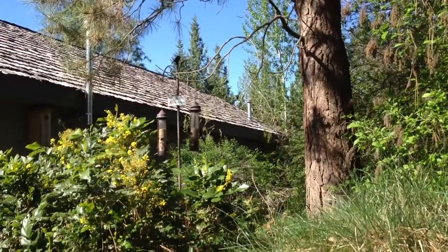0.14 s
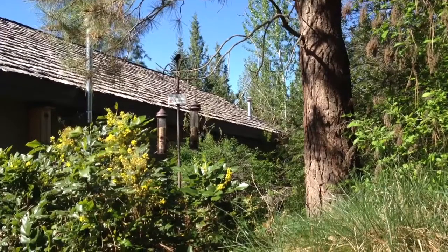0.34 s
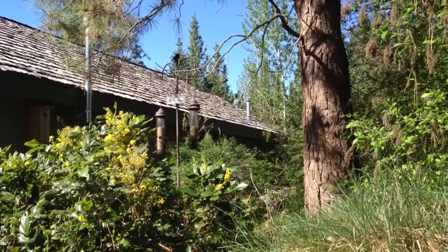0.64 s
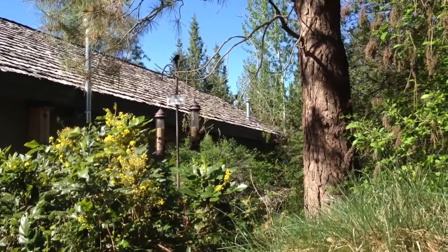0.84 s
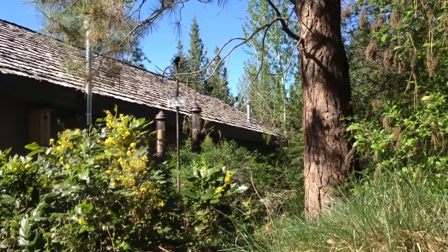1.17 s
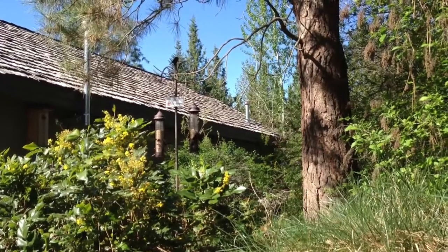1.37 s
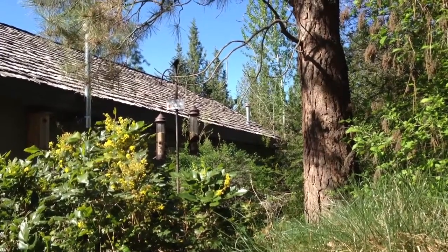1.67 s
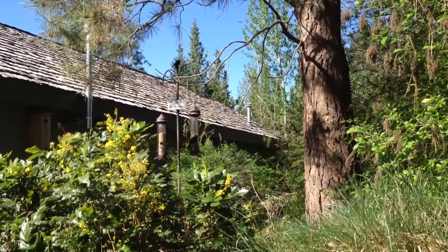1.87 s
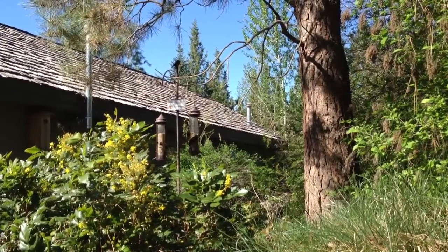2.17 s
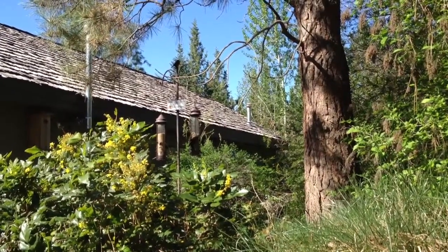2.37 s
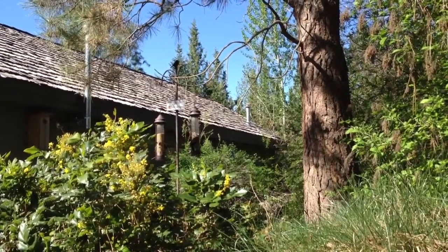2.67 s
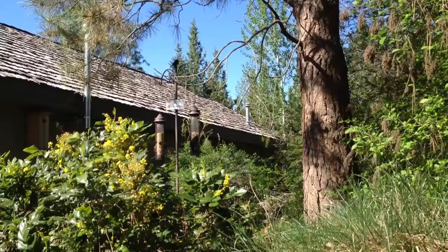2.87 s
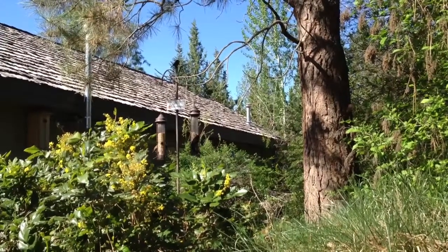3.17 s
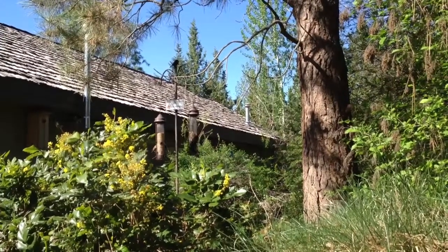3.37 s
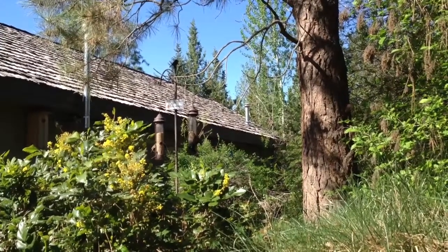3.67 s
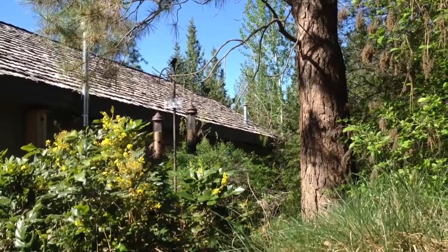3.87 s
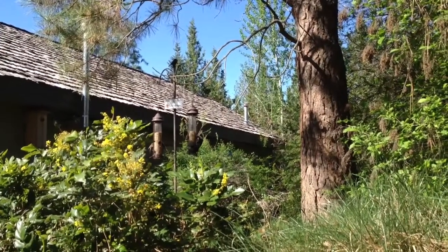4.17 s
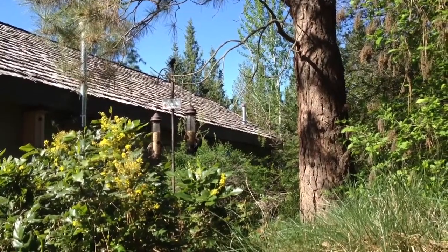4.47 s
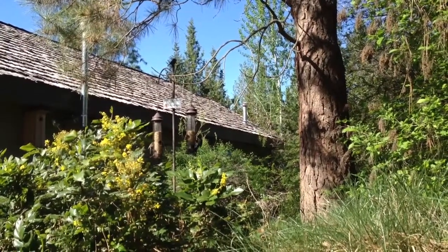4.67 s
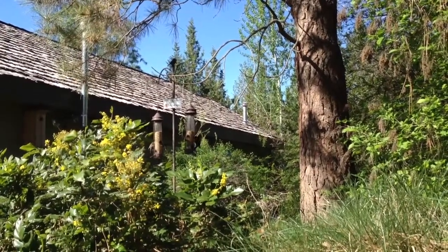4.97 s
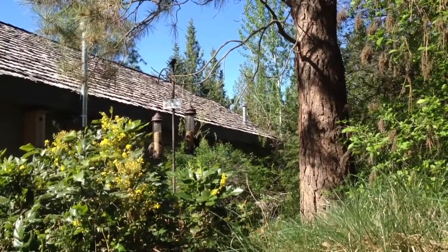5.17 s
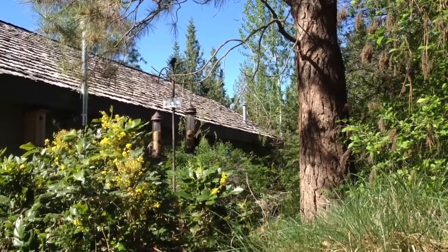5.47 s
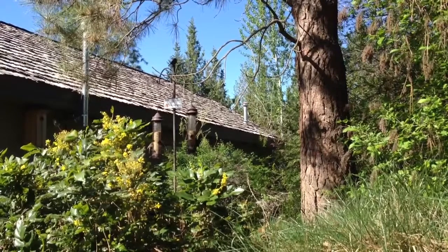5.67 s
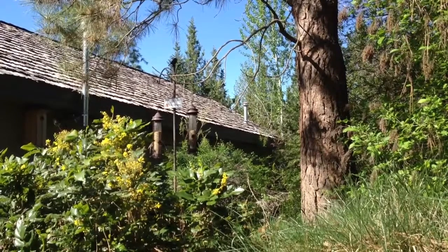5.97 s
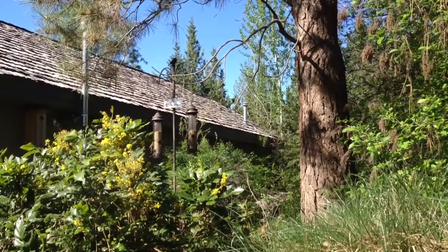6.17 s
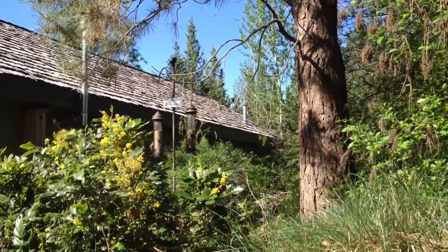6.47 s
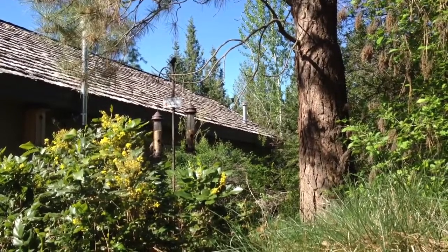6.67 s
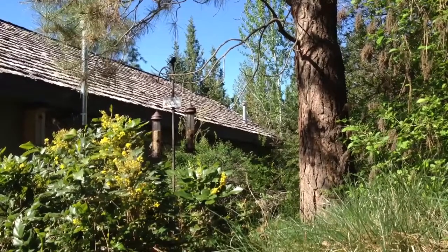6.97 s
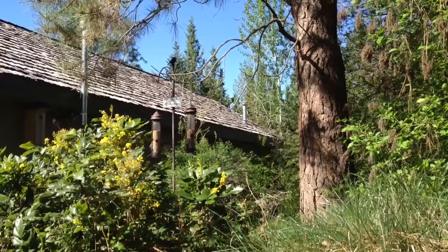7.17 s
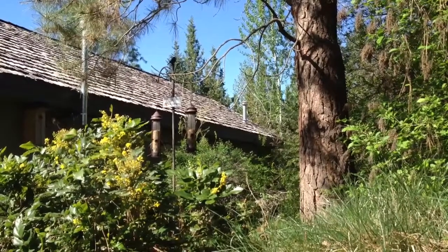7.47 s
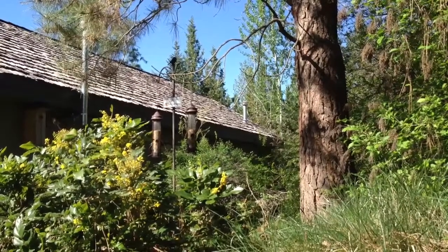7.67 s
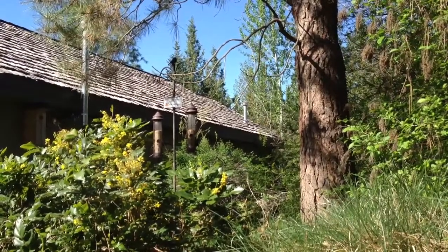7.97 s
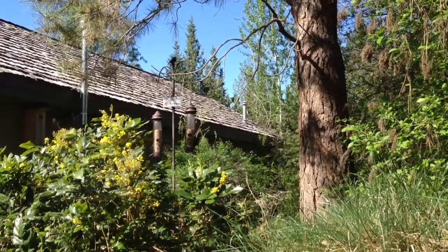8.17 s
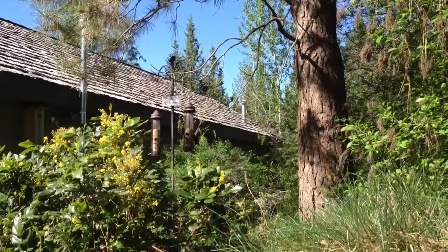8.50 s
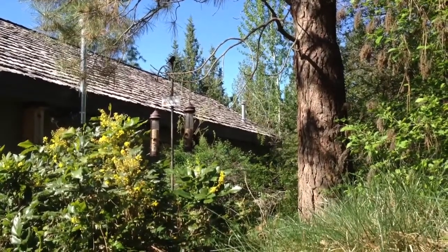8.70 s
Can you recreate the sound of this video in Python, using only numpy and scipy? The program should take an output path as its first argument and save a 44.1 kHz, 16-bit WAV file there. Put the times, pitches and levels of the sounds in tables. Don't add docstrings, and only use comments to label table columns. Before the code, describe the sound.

Outdoor birdsong, close and distant, over very quiet traffic rumble and hiss. Isolated chucks and chirps lead to a clear, broken whistle just after one second. From about two and a half seconds the chorus thickens with thin whistles, buzzes, low fluty notes, quick zips and a rasping trill. It thins near six seconds, then a loud sliding whistle, hooked chirps and strong chucks arrive. Short garden reflections surround a stationary microphone.

```python
import sys
import numpy as np
from scipy import signal
from scipy.fft import rfft, irfft, next_fast_len
from scipy.io import wavfile
from scipy.ndimage import uniform_filter1d

SR = 44100
rng = np.random.default_rng(int(sys.argv[2]) if len(sys.argv) > 2 else 0)


def persist_wave(psi):
    counts = np.round(np.clip(psi, -1, 1) * 32767).astype(np.int16)
    wavfile.write(sys.argv[1], SR, np.atleast_2d(counts).T)


def elevation(decibels):
    levels = np.asarray(decibels, float)
    return 10 ** (levels / 20)


N = 389844

# (multiple of the pitch [1], level [dB])
WHISTLE_OVERTONES = [(1, -0.5), (2, -34), (3, -36)]
# (multiple of the pitch [1], level [dB])
CHIRP_OVERTONES = [(1, 5.5), (2, -39), (3, -27)]
# (multiple of the pitch [1], level [dB])
HARSH_PARTIALS = [(1, 4.5), (1.751, -24.5), (2.7, -23), (3.3, -32)]


def rms_one(x):
    return x / np.sqrt(np.mean(x ** 2) + 1e-20)


def slow_chance(count, rate_hz):
    pole = np.exp(-2 * np.pi * rate_hz / SR)
    settling = 4000
    white = rng.standard_normal(count + settling)
    return rms_one(signal.lfilter([1], [1, -2 * pole, pole * pole], white)[settling:])


def coloured_noise(spectrum):
    size = next_fast_len(N)
    hz = np.maximum(np.arange(size // 2 + 1) * SR / size, 1)
    point_hz, point_db = np.array(spectrum).T
    level_db = np.interp(np.log(hz), np.log(point_hz), point_db, left=-90, right=-90)
    return rms_one(irfft(rfft(rng.standard_normal(size)) * elevation(level_db), size)[:N])


def sing(note, tones, jitter, jitter_hz, rasp_db=-90, rasp_low_hz=2400, slide_rough=1.1, flicker_db=3.0):
    s, pitch_hz, level_db = np.transpose(note)
    t = np.arange(s[0], s[-1], 1 / SR)
    pitch_hz = np.interp(t, s, pitch_hz)
    level_db = np.interp(t, s, level_db)

    sliding = uniform_filter1d(np.abs(np.gradient(np.log(pitch_hz))) * SR, size=600)
    unsteady = jitter * (1 + slide_rough * np.minimum(sliding, 3.0))
    sung_hz = pitch_hz * (1 + unsteady * slow_chance(len(t), jitter_hz))
    phase = 2 * np.pi * np.cumsum(sung_hz) / SR
    voice = sum(elevation(db) * np.sqrt(2) * np.sin(k * phase + k * k) for k, db in tones)

    rasp_band = signal.butter(1, [rasp_low_hz, 4800], "band", fs=SR)
    rasp = signal.lfilter(*rasp_band, rng.standard_normal(len(t)))
    effort_db = .45 * (level_db + 40)
    voice = voice + elevation(rasp_db + effort_db) * rasp

    flutter_db = flicker_db * slow_chance(len(t), 77)
    flutter_db = flutter_db - flutter_db.mean()
    fade_s = np.clip(.04 * (s[-1] - s[0]), .0006, .006)
    fade = np.clip(np.minimum(t - s[0], s[-1] - t) / fade_s, 0, 1)
    return voice * elevation(level_db + flutter_db) * fade


def garden(early_db, tail_db, t60):
    t = np.arange(int(.9 * SR)) / SR
    sparse = rng.standard_normal(len(t)) * (rng.random(len(t)) < 800 / SR)
    wall_s, wall_spread_s = .036, .002
    wall = 1 + 2.2 * np.exp(-.5 * ((t - wall_s) / wall_spread_s) ** 2)
    early = sparse * wall * (t > .004) * elevation(-60 * np.maximum(t - .04, 0) / 0.13)
    tail = rng.standard_normal(len(t)) * np.minimum(t / 0.0039, 1) * elevation(-60 * t / t60)
    echoes = elevation(early_db) * early / np.linalg.norm(early)
    echoes = echoes + elevation(tail_db) * tail / np.linalg.norm(tail)
    echoes = signal.lfilter([.85], [1, -.15], echoes)
    echoes[0] = 1
    return echoes / np.linalg.norm(echoes)


def add(out, s, sound, echoes):
    start = int(s * SR)
    heard = signal.fftconvolve(sound, echoes)
    heard = heard * np.linalg.norm(sound) / np.linalg.norm(heard)
    heard = heard[:N - start]
    out[start:start + len(heard)] += heard


def chorus(notes, tones, jitter, jitter_hz, early_db, tail_db, t60, rasp_db=-90, slide_rough=1.27, flicker_db=3.5):
    out = np.zeros(N)
    for note in notes:
        voice = sing(note, tones, jitter, jitter_hz, rasp_db, slide_rough=slide_rough, flicker_db=flicker_db)
        add(out, note[0][0], voice, garden(early_db, tail_db, t60))
    return out


def arch(share, peak_share, rise_db, fall_db):
    peak = np.clip(peak_share, .05, .95)
    before = np.maximum(1 - share / peak, 0)
    after = np.maximum((share - peak) / (1 - peak), 0)
    return rise_db * before ** 2 + fall_db * after ** 2


def glides(rows, bend, peak_share, rise_db, fall_db):
    share = np.linspace(0, 1, 24)
    left = (np.exp(-bend * share) - np.exp(-bend)) / (1 - np.exp(-bend))
    loss_db = arch(share, peak_share, rise_db, fall_db)
    notes = []
    for s, length, first_hz, last_hz, db in rows:
        pitch_hz = last_hz + (first_hz - last_hz) * left
        notes.append(np.c_[s + length * share, pitch_hz, db - loss_db])
    return notes


def air():
    # (frequency [Hz], density [dB per Hz])
    air_colour = [(25, -32), (42, -20), (60, -15), (150, 0.5), (230, 0), (480, -6), (1300, -5), (2000, -8),
                  (3200, -18), (4900, -20.5), (5700, -19.5), (8500, -19.5), (12000, -22), (15300, -23)]
    return elevation(-60.5) * coloured_noise(air_colour)


def flock():
    # (time [s], level [dB])
    flock_loudness = [
        (0.0, -79.5),
        (2.56, -78),
        (2.6, -61),
        (3.1, -65),
        (3.599, -69),
        (4.36, -60.5),
        (6.202, -81.5),
        (6.872, -82),
        (8.84, -65),
    ]
    # (frequency [Hz], density [dB per Hz])
    flock_colour = [(2400, -2.5), (3300, -4), (4300, -2.5), (5000, -3), (5700, -13.5), (8500, -26)]
    s, loud_db = np.transpose(flock_loudness)
    band = coloured_noise(flock_colour)
    drift_db = 1.3 * slow_chance(N, 14.0)
    return band * elevation(np.interp(np.arange(N) / SR, s, loud_db) + 4.5 + drift_db)


def strands():
    # (time [s], length [s], first pitch [Hz], last pitch [Hz], level [dB])
    held_rows = [(2.046, .065, 4250, 4380, -62), (2.041, .07, 3550, 3750, -64),
                 (2.546, .06, 4850, 4800, -57), (3.201, .18, 5020, 4970, -65),
                 (1.371, .06, 5600, 5560, -63), (1.281, .04, 5950, 6000, -68),
                 (1.266, .03, 4950, 4900, -55), (4.231, .06, 3820, 3780, -55),
                 (4.031, .12, 5500, 5600, -66), (4.331, .15, 2800, 2760, -55),
                 (7.821, .07, 4150, 4500, -60), (8.171, .06, 4950, 4950, -57),
                 (8.576, .035, 3480, 3400, -54), (6.42, .04, 3000, 2970, -62)]
    notes = glides(held_rows, bend=1.5, peak_share=.45, rise_db=4, fall_db=4)
    return chorus(notes, WHISTLE_OVERTONES, .006, 140, early_db=-3, tail_db=-6, t60=.25)


def far_slurs():
    # (time [s], length [s], settled pitch [Hz], level [dB], loudest moment [0-1])
    slur_rows = [
        (.47, 0.35, 4150, -50.5, 0.62),
        (5.34, 0.41, 4270, -50, 0.07),
        (7.52, 0.15, 4170, -49, 0.46),
    ]
    # (multiple of the pitch [1], level [dB])
    far_overtones = [(1, -1.5), (2, -26.5), (3, -26.5)]
    first_hz, settle_s = 5500, 0.045
    ramp_s, ramp_db = 0.011, 3
    share = np.linspace(0, 1, 60)
    notes = []
    for s, length, held_hz, db, peak_share in slur_rows:
        t = length * share
        pitch_hz = held_hz + (first_hz - held_hz) * np.exp(-t / settle_s)
        attack_loss_db = ramp_db * np.maximum(1 - t / ramp_s, 0)
        release_loss_db = ramp_db * np.maximum(1 - (length - t) / ramp_s, 0)
        effort_loss_db = arch(share, peak_share, rise_db=9, fall_db=11)
        notes.append(np.c_[s + t, pitch_hz, db - attack_loss_db - release_loss_db - effort_loss_db])
    return chorus(notes, far_overtones, 0.0029, 153, early_db=1, tail_db=-6, t60=0.3,
                  slide_rough=8.44, flicker_db=3.4)


def far_flutes():
    # (time [s], length [s], mean pitch [Hz], level [dB])
    flute_rows = [(2.486, 0.035, 1455, -63), (2.66, 0.069, 1405, -61), (2.846, 0.089, 1971, -53),
                  (3.385, 0.021, 2200, -57.5), (3.406, 0.022, 1907, -58.5), (3.426, 0.12, 1457, -57),
                  (3.612, 0.047, 2366, -59), (3.629, 0.068, 2126, -53), (4.15, 0.067, 1146, -61),
                  (4.3, 0.11, 1195, -59.5), (4.139, 0.018, 1950, -54), (4.226, 0.014, 2050, -51.5),
                  (4.566, 0.068, 2400, -48.5), (4.57, 0.028, 2150, -43.5), (4.699, 0.097, 1136, -63),
                  (4.978, 0.165, 1218, -54.5), (5.547, 0.093, 1590, -70), (6.66, 0.027, 2170, -64),
                  (8.333, 0.087, 2047, -67.5), (8.531, 0.069, 1505, -61), (8.755, 0.21, 1536, -49.5),
                  (2.3, 0.068, 1167, -70.5), (3.59, 0.047, 1430, -63)]
    sag_per_s = 0.27
    rows = []
    for s, length, hz, db in flute_rows:
        half_sag = .5 * sag_per_s * length
        rows.append((s, length, hz * (1 + half_sag), hz * (1 - half_sag), db))
    notes = glides(rows, bend=0.18, peak_share=0.27, rise_db=17.5, fall_db=8.0)
    return chorus(notes, [(1, 4.5), (2, -19.0)], 0.00056, 45, early_db=-1.0, tail_db=-8.5, t60=0.82)


def near_flute():
    # (time [s], pitch [Hz], level [dB])
    flute_curve = [
        (3.802, 1650, -68),
        (3.824, 1637, -56),
        (3.848, 1598, -62),
        (3.886, 1578, -45.5),
        (3.956, 1580, -42),
        (3.98, 1565, -46.5),
        (4.025, 1590, -74),
        (4.052, 1585, -53),
        (4.12, 1590, -73),
    ]
    return chorus([flute_curve], [(1, 0), (2, -36)], 0.00074, 45, early_db=-11, tail_db=-10.5, t60=0.9,
                  flicker_db=1.3)


def nasal_buzzes():
    # (time [s], length [s], first pulse rate [Hz], last pulse rate [Hz], level [dB])
    buzz_rows = [
        (2.65, 0.93, 380.7, 386.1, -67),
        (3.8, 0.64, 385, 391.5, -60.5),
        (8.54, 0.295, 376.8, 386.3, -61.5),
    ]
    # (multiple of the pulse rate [1], level [dB])
    throat = [(5, -9.5), (6, -9.5), (7, 1.5), (8, -6), (9, -10.5), (10, -2), (11, -3), (12, -5.5), (13, -9),
              (14, -11.5)]
    notes = glides(buzz_rows, bend=0.23, peak_share=0.11, rise_db=0, fall_db=3.5)
    return chorus(notes, throat, 0.0025, 25, early_db=-5, tail_db=-3, t60=0.6, rasp_db=5, flicker_db=2.6)


def harsh_trill():
    # (time [s], centre pitch [Hz], level [dB])
    trill_curve = [
        (4.17, 2493, -53),
        (4.22, 2488, -59.5),
        (4.3, 2662, -56),
        (4.36, 2778, -56),
        (4.46, 2877, -55),
        (4.55, 2760, -51.5),
        (4.6, 2500, -79),
    ]
    # (multiple of the pitch [1], level [dB])
    trill_partials = [(0.999, 4), (1.3, 2), (1.6, -2.5), (2.002, -9)]
    return chorus([trill_curve], trill_partials, .04, 162, early_db=14.0, tail_db=15, t60=0.45)


def harsh_chirps():
    # (time [s], length [s], first pitch [Hz], last pitch [Hz], level [dB])
    harsh_rows = [(1.275, 0.069, 4170, 3370, -58.5), (1.46, 0.04, 4320, 3800, -66),
                  (7.51, 0.056, 5500, 4700, -63), (.455, 0.06, 5570, 4800, -64),
                  (.34, 0.1, 4460, 3540, -61), (3.715, 0.079, 4250, 4960, -52),
                  (3.72, 0.078, 3624, 3750, -56.5), (3.73, 0.1, 3910, 4400, -56.5),
                  (4.23, 0.084, 4610, 3490, -57), (6.37, 0.024, 4320, 4630, -55.5),
                  (7.93, 0.022, 3950, 4940, -60), (8.67, 0.024, 4140, 3510, -59.5)]
    notes = glides(harsh_rows, bend=0.355, peak_share=0.72, rise_db=2, fall_db=1.0)
    return chorus(notes, HARSH_PARTIALS, 0.0099, 420, early_db=-4.5, tail_db=-1.0, t60=0.64, rasp_db=5.0)


def zips():
    # (time [s], length [s], first pitch [Hz], last pitch [Hz], level [dB])
    zip_rows = [
        (0.068, 0.012, 3680, 4770, -49.5),
        (2.496, 0.029, 3530, 4660, -52.5),
        (2.802, 0.015, 3730, 4530, -50),
        (4.527, 0.02, 3600, 4465, -41),
        (4.697, 0.022, 3500, 4520, -42),
        (4.908, .02, 3540, 4530, -40),
        (5.075, .02, 3680, 4530, -40),
        (6.502, 0.014, 4040, 4800, -60),
    ]
    stroke_s, pitch_step, loss_db = .015, 1.04, 0.5
    strokes = []
    for s, length, first_hz, last_hz, db in zip_rows:
        for k in range(3):
            higher = pitch_step ** k
            strokes.append((s + k * stroke_s, length, first_hz * higher, last_hz * higher, db - k * loss_db))
    notes = glides(strokes, bend=0.29, peak_share=0.75, rise_db=10, fall_db=2.5)
    return chorus(notes, HARSH_PARTIALS, 0.0043, 360, early_db=-17.0, tail_db=3.0, t60=0.2,
                  rasp_db=2, flicker_db=4.5)


def chirps():
    # (time [s], length [s], first pitch [Hz], last pitch [Hz], level [dB])
    chirp_rows = [(8.326, .03, 5850, 6050, -66), (2.006, .035, 4300, 4900, -68),
                  (2.571, .05, 3900, 3620, -57), (3.081, .09, 4900, 4750, -63),
                  (3.171, .06, 4550, 4450, -64), (4.206, .007, 5150, 4400, -48),
                  (4.217, .008, 4800, 3750, -50), (6.266, .03, 5950, 5700, -65),
                  (7.406, .035, 6250, 5750, -63), (7.717, .02, 4750, 4840, -50),
                  (7.761, .016, 4750, 4660, -50), (7.861, .02, 4600, 5200, -63),
                  (6.456, .02, 4700, 5400, -68), (8.791, .04, 3450, 3550, -62),
                  (5.044, .011, 4800, 3200, -46), (5.054, .011, 4300, 3300, -46),
                  (.051, .01, 5600, 5900, -62), (6.541, .012, 3350, 3850, -63),
                  (6.561, .02, 4750, 4600, -62), (2.181, .04, 5900, 6100, -71),
                  (6.713, .02, 5500, 5850, -63), (7.516, .025, 3700, 3050, -61),
                  (2.52, .025, 4300, 4400, -54)]
    notes = glides(chirp_rows, bend=1.4, peak_share=0.5, rise_db=3, fall_db=2.5)
    return chorus(notes, CHIRP_OVERTONES, 0.0046, 170, early_db=-4.0, tail_db=2.5, t60=0.37)


def finches():
    # (time after start [s], pitch [Hz], level [dB])
    finch_curve = [(0, 3700, -1), (.006, 4680, 3), (.014, 4850, 8), (.021, 4300, 4), (.03, 3750, -1),
                   (.044, 3680, -4.5), (.052, 3750, -6.5), (.075, 3330, -6.5), (.09, 3200, -10)]
    # (time [s], level [dB])
    finch_calls = [
        (0.257, -55.5),
        (2.206, -56.5),
        (2.882, -55),
        (5.183, -54.5),
        (5.391, -58),
        (6.123, -55),
        (7.071, -57),
        (7.783, -56.5),
        (8.177, -66),
        (8.527, -56.5),
    ]
    notes = []
    for s, db in finch_calls:
        pitch = 1 + 0.0156 * rng.standard_normal()
        notes.append(np.array(finch_curve) * [1, pitch, 1] + [s, 0, db])
    return chorus(notes, CHIRP_OVERTONES, 0.0063, 254, early_db=-3, tail_db=-5, t60=0.25)


def sweeps():
    # (time [s], length [s], first pitch [Hz], last pitch [Hz], level [dB])
    sweep_rows = [
        (6.276, .053, 5700, 3900, -60),
        (7.413, .072, 5850, 3720, -58),
        (8.353, .058, 5250, 3720, -60),
        (6.34, .07, 3800, 3050, -71),
    ]
    # (time [s], length [s], first pitch [Hz], last pitch [Hz], level [dB])
    drop_rows = [
        (6.306, .035, 5300, 4350, -59),
        (7.453, .036, 5300, 4150, -54),
        (8.383, .034, 5150, 4000, -56),
    ]
    # (time after start [s], pitch [Hz], level [dB])
    hook_voices = [
        [(0, 3340, 0), (.008, 3920, -3), (.02, 4205, 2.5), (.032, 3910, -8.5), (.047, 3580, 0)],
        [(.004, 4430, 1), (.018, 4355, -4), (.036, 4230, -8)],
    ]
    # (time [s], level [dB])
    hook_calls = [
        (6.473, -55),
        (7.883, -52.5),
    ]
    notes = glides(sweep_rows, bend=2.1, peak_share=0.42, rise_db=14, fall_db=0)
    notes += glides(drop_rows, bend=-0.576, peak_share=.72, rise_db=18, fall_db=0)
    for s, db in hook_calls:
        for voice in hook_voices:
            notes.append(np.array(voice) + [s, 0, db])
    return chorus(notes, CHIRP_OVERTONES, 0.0021, 150, early_db=-16.5, tail_db=-1, t60=0.37, flicker_db=4.5)


def chucks():
    # (time after start [s], pitch [Hz], level [dB])
    chuck_curve = [(0, 2210, 11.5), (.003, 1863, 4), (.009, 1890, 8), (0.015, 1700, 5.5),
                   (.022, 1500, -6.5)]
    # (time [s], level [dB], pitch factor [1], rasp [dB])
    chuck_calls = [(.012, -46.5, 1.014, -19), (0.401, -53, 0.97, -14), (0.424, -55, 0.89, 3),
                   (0.956, -52, 1.03, -1), (1.858, -45.5, 1.01, -16), (1.867, -39.5, 1.03, -16),
                   (3.86, -50, 0.94, -23), (4.042, -42.5, .98, -13), (4.476, -41, 1.25, -14.5),
                   (5.047, -37.5, 0.96, -19), (6.791, -44.5, 0.94, -12), (7.712, -55.5, 0.97, 4.5),
                   (8.128, -38, 0.94, -35), (8.14, -41, 1.06, -11), (8.444, -32.5, .97, -26),
                   (8.454, -46, 0.98, -0.5), (7.526, -48.5, 1.14, -13), (8.685, -55.5, 1.1, 5)]
    # (multiple of the pitch [1], level [dB])
    chuck_overtones = [(1, -22.5), (2, -7.5), (3, -27), (4, -36), (5, -45), (6, -38)]
    out = np.zeros(N)
    for s, db, pitch, rasp_db in chuck_calls:
        note = np.array(chuck_curve) * [1, pitch, 1] + [s, 0, db]
        echoes = garden(early_db=-2.5, tail_db=-6.5, t60=.4)
        add(out, s, sing(note, chuck_overtones, 0.0091, 460, rasp_db, rasp_low_hz=875), echoes)
    return out


def rises():
    # (time [s], length [s], first pitch [Hz], last pitch [Hz], level [dB])
    rise_rows = [
        (2.58, 0.31, 4087, 4386, -48.5),
        (4.0, 0.13, 4650, 4815, -47.5),
        (4.44, 0.054, 4560, 4910, -41.5),
        (4.5, 0.22, 7210, 8270, -49),
        (4.57, 0.081, 7740, 9100, -51.5),
        (3.86, 0.11, 5870, 6360, -70),
        (7.662, 0.12, 4136, 4265, -39.5),
    ]
    notes = glides(rise_rows, bend=2.7, peak_share=0.51, rise_db=5.5, fall_db=14)
    return chorus(notes, WHISTLE_OVERTONES, 0.0015, 82.0, early_db=-2, tail_db=-9, t60=0.6,
                  slide_rough=4.1, flicker_db=3.0)


def climbs_and_dip():
    # (time [s], pitch [Hz], level [dB])
    climb_curves = [
        [(6.73, 4460, -55.5), (6.82, 4473, -54.5), (6.87, 5310, -52), (6.912, 6160, -52), (6.925, 7450, -52),
         (6.94, 8070, -51), (6.965, 8200, -56)],
        [(6.97, 5870, -50), (7.015, 6030, -61), (7.05, 6620, -54.5), (7.11, 6710, -71)],
    ]
    # (time [s], pitch [Hz], level [dB])
    dip_curves = [
        [(2.37, 9830, -56), (2.42, 8330, -69), (2.47, 6900, -74), (2.5, 6450, -68)],
        [(2.5, 6420, -65), (2.525, 6440, -54), (2.55, 6150, -51), (2.575, 6010, -47), (2.612, 5700, -56),
         (2.632, 6020, -50), (2.67, 6025, -49), (2.69, 6050, -61)],
        [(2.695, 5760, -60), (2.73, 6200, -59), (2.758, 6300, -55), (2.77, 7000, -54), (2.79, 7730, -50),
         (2.86, 9100, -65)],
    ]
    # (multiple of the pitch [1], level [dB])
    bright_overtones = [(1, 2), (2, -15), (3, -16)]
    return chorus(climb_curves + dip_curves, bright_overtones, 0.00318, 97, early_db=-1.0, tail_db=-4.5, t60=0.31,
                  slide_rough=1.53)


def near_slurs():
    # (time [s], pitch [Hz], level [dB])
    slur_curves = [
        [(1.104, 6300, -50), (1.13, 5380, -43.5), (1.165, 4800, -40.5), (1.21, 4450, -40), (1.25, 4415, -39),
         (1.262, 4420, -42)],
        [(1.268, 4500, -36), (1.3, 4400, -39), (1.322, 4270, -36), (1.352, 4450, -38), (1.37, 4470, -33),
         (1.41, 4530, -37), (1.428, 4680, -41), (1.445, 4700, -56)],
        [(6.85, 6080, -57), (6.88, 5140, -42.5), (6.91, 4713, -35.5), (6.95, 4620, -39), (7.0, 4500, -35),
         (7.05, 4370, -29.5), (7.11, 4323, -34.5), (7.15, 4620, -42), (7.18, 4500, -44)],
    ]
    return chorus(slur_curves, WHISTLE_OVERTONES, 0.0025, 72.7, early_db=-8, tail_db=-14, t60=0.45,
                  slide_rough=4.0, flicker_db=3.8)


def scene():
    background = air() + flock() + strands() + far_slurs()
    low_voices = far_flutes() + near_flute() + nasal_buzzes()
    rough_voices = harsh_trill() + harsh_chirps() + zips()
    short_calls = chirps() + finches() + sweeps() + chucks()
    whistles = rises() + climbs_and_dip() + near_slurs()
    return (background + low_voices + rough_voices + short_calls + whistles)[None]


def roll_off(x):
    return signal.sosfilt(signal.butter(12, 15570, fs=SR, output="sos"), x)


def record(dry):
    dip_hz, dip_width_hz, dip_share = 9470, 2870, 0.57
    shaded_band = signal.lfilter(*signal.iirpeak(dip_hz, dip_hz / dip_width_hz, fs=SR), dry)
    shaded = dry - dip_share * shaded_band
    low_pass = signal.ellip(12, .5, 70, 15290, fs=SR, output="sos")
    mix = signal.sosfilt(low_pass, shaded)
    return roll_off(mix)


dry = scene()
out = record(dry)
persist_wave(out)
```